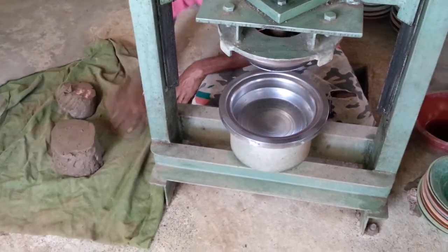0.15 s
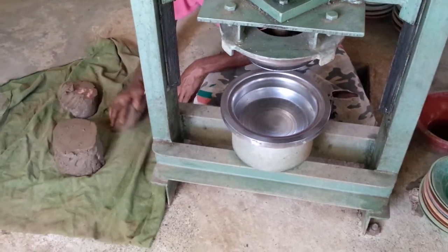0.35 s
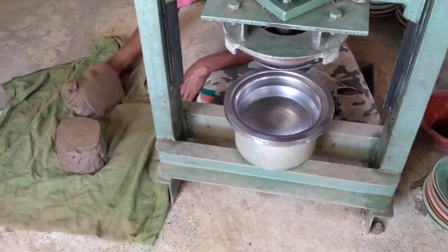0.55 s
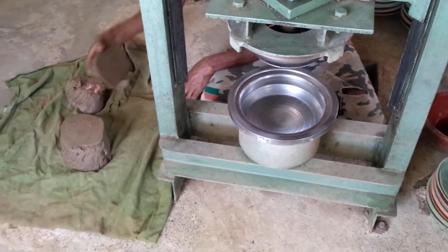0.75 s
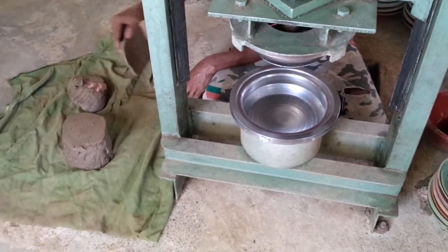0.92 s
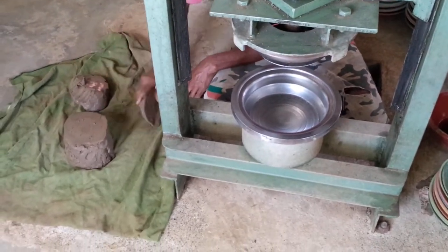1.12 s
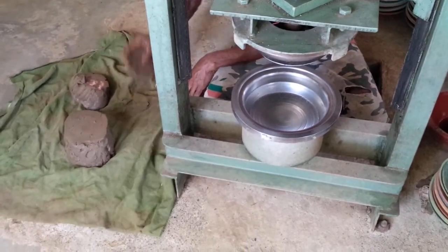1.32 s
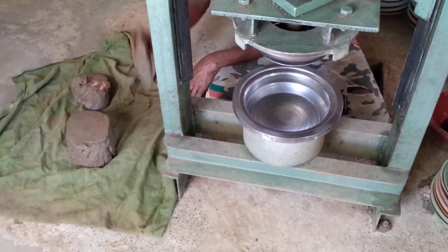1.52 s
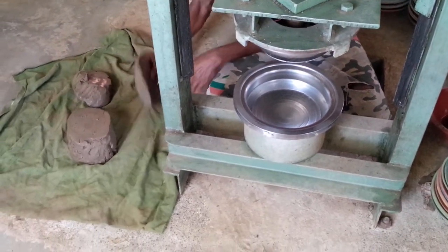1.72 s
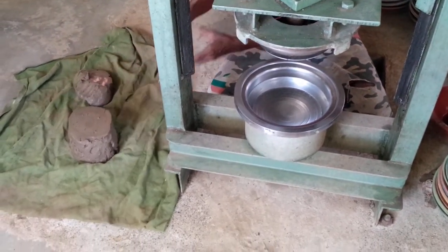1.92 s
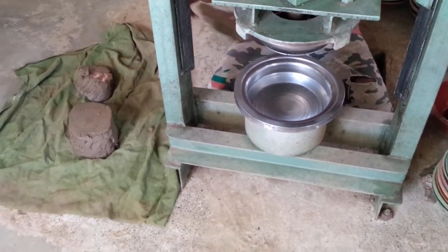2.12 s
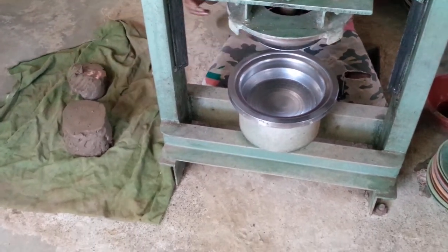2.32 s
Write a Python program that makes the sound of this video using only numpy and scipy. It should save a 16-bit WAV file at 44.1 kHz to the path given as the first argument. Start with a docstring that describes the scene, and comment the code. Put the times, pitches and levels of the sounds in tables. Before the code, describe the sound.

Lump of wet clay smacked down by hand, short roomy echo, later dull pats, faint insects

```python
"""Bare workshop open to the outdoors: air noise, wavering hum, insect hiss and a swelling rumble run throughout.
At 0.2 s a lump of wet clay is slapped down by hand beside a steel press: pressure swing, air-pocket pop,
wet crack and spray, then echoes, a noise-built room tail and the press's faint ringing modes.
Next the palm slides (filtered noise) and faint squeaks sound (narrow noise); near 1.12 s come soft pats
(noise puffs) and a hollow note (dying sine); from 1.6 s hands and cloth shuffle (filtered noise)."""
import sys
import numpy as np
from scipy import signal
from scipy.fft import rfft, irfft
from scipy.io import wavfile
from scipy.ndimage import uniform_filter1d

SR = 44100
rng = np.random.default_rng(int(sys.argv[2]) if len(sys.argv) > 2 else 0)


def inscribe(sig):
    """Save sig as 16-bit PCM at rate SR to the path in sys.argv[1].

    A 1-D sig is mono; a 2-D sig holds one channel per row.
    Samples are clipped to [-1, 1] before scaling.
    """
    pcm = np.round(np.clip(np.atleast_2d(sig).T, -1, 1) * 32767)
    wavfile.write(sys.argv[1], SR, pcm.astype(np.int16))


N = 103635  # samples


def amp(db):
    """Decibels to gain."""
    return 10 ** (np.asarray(db) / 20)


def evened(x):
    """Scales to rms 1."""
    return x / np.sqrt(np.mean(x ** 2) + 1e-20)


def read(points, hz):
    """Interpolates a table on a log-frequency axis."""
    f, value = np.transpose(points)
    return np.interp(np.log(hz + 1), np.log(f + 1), value)


def add(mix, start_s, sound):
    """Mixes a sound in at a start time, cut at the end of the mix."""
    part = mix[:, max(round(start_s * SR), 0):][:, :sound.shape[-1]]
    part += sound[..., :part.shape[1]]


def dying(t, t60_s):
    """Exponential decay: 60 dB down after t60_s."""
    return np.exp(-np.log(1000) * t / t60_s)


def drift(top_hz):
    """Slow random wander of rms 1: sines from 2 Hz to top_hz, weaker as they get faster."""
    t = np.arange(0, N + 128, 128) / SR
    wander = 0
    for f in np.geomspace(2, top_hz, 20):
        wander = wander + np.sin(2 * np.pi * (f * t + rng.random())) / np.sqrt(f)
    return np.interp(np.arange(N) / SR, t, evened(wander))


def grain(size, width):
    """Smoothed noise of rms 1; width in samples."""
    return evened(uniform_filter1d(rng.standard_normal(size), size=width))


def humps(rows):
    """Sum of Gaussian swells: middle in seconds, half length in seconds (to 1/e), level in dB."""
    t = np.arange(N) / SR
    return sum(amp(db) * np.exp(-((t - middle) / half) ** 2) for middle, half, db in rows)


def noise(colour_db, same):
    """Stereo noise of rms 1: gain per frequency sets colour, mid/side balance sets channel likeness."""
    hz = np.fft.rfftfreq(N, 1 / SR)
    mid, side = rfft(rng.standard_normal((2, N)))
    likeness = np.clip(read(same, hz), -1, 1)
    mid, side = mid * np.sqrt(1 + likeness), side * np.sqrt(1 - likeness)
    return evened(irfft(np.array([mid + side, mid - side]) * amp(colour_db(hz)), N))


# Likeness of background sound in the two channels. Each row: frequency in Hz, likeness 0-1.
AIR_LIKENESS = [(50, .995), (250, 0.94), (700, .93), (2000, .88), (4500, .65), (7500, 0.7), (12000, 0)]


def band(centre_hz, width_hz):
    """Narrow noise band: 3 dB down at width_hz either side of the centre."""
    return noise(lambda hz: -10 * np.log10(1 + ((hz - centre_hz) / width_hz) ** 4), AIR_LIKENESS)


# Colour of distant outdoor noise. Each row: frequency in Hz, relative level in dB.
AIR_COLOUR = [(20, -5), (50, 2.5), (75, -3.5), (105, -8.5), (140, -8), (220, -12.5), (400, -16),
              (700, -17.5), (1000, -20.5), (1500, -28.5), (2300, -35.5), (4500, -40.5), (9500, -44),
              (13000, -49), (16000, -58.5)]
AIR_DB, AIR_SWELL_DB = -52.5, 1.6  # swell is rms


def air():
    """Distant outdoor noise: coloured noise with a wandering level."""
    return noise(lambda hz: read(AIR_COLOUR, hz), AIR_LIKENESS) * amp(AIR_DB + AIR_SWELL_DB * drift(top_hz=24))


# Hum level before flutter. Each row: time in seconds, level in dB.
HUM_LEVEL = [(0, -66), (.6, -57), (1.05, -61), (1.4, -63), (1.699, -69.5), (2.35, -64.5)]
HUM_HZ, HUM_WAVER_HZ, HUM_FLUTTER_DB = 159.5, 4.9, 2  # waver and flutter are rms


def hum():
    """Wavering hum: one sine whose pitch and level wander."""
    level_db = np.interp(np.arange(N) / SR, *np.transpose(HUM_LEVEL))
    level_db = level_db + HUM_FLUTTER_DB * drift(top_hz=15)
    pitch_hz = HUM_HZ + HUM_WAVER_HZ * drift(top_hz=12)
    return amp(level_db) * evened(np.sin(2 * np.pi * np.cumsum(pitch_hz) / SR))


# Colour of the insect chorus. Each row: frequency in Hz, relative level in dB.
INSECT_COLOUR = [(5200, -35), (6100, -20), (6700, -7.5), (7330, -1.5), (7900, -7), (8400, -11.5),
                 (8900, -25.5), (10000, -45.5)]
INSECTS_DB, INSECTS_FLUTTER_DB = -63, 1.15  # flutter is rms


def insects():
    """Insect chorus: a steady high noise band with slight level flutter."""
    hiss = noise(lambda hz: read(INSECT_COLOUR, hz), AIR_LIKENESS)
    return hiss * amp(INSECTS_DB + INSECTS_FLUTTER_DB * drift(top_hz=41.4))


# Rumble swells. Each row: middle in seconds, half length in seconds, level in dB.
RUMBLE_SWELLS = [(.13, 0.055, -49.5), (.66, 0.078, -55), (1.115, 0.039, -46), (1.40, 0.042, -45.5),
                 (1.80, .09, -48)]
RUMBLE_HZ, RUMBLE_WIDTH_HZ = 51, 12


def rumble():
    """Low rumble: a narrow noise band, mono, that swells and fades."""
    return band(RUMBLE_HZ, RUMBLE_WIDTH_HZ).mean(0) * humps(RUMBLE_SWELLS)


THUMP_S, THUMP_DB = 0.00028, -11.5  # THUMP_S: swing's centre to its peak


def thump(t):
    """Pressure swing as the air is squeezed out: one smooth dip and peak."""
    u = t / THUMP_S - 3
    return amp(THUMP_DB) * u * np.exp((1 - u ** 2) / 2)


POP_HZ, POP_T60_S, POP_DB = 637, 0.004, -12


def pop(t):
    """Air pocket under the clay: slope of a short dying sine, scaled to its peak level."""
    ring = np.gradient(np.sin(2 * np.pi * POP_HZ * t) * t * dying(t, POP_T60_S))
    return amp(POP_DB) * ring / abs(ring).max()


def click(colour, size=4096):
    """Minimum-phase click of the given colour, energy 1."""
    log_gain = np.log(amp(read(colour, abs(np.fft.fftfreq(size, 1 / SR)))))
    wave = np.fft.ifft(np.exp(np.conj(signal.hilbert(log_gain)))).real
    return wave / np.linalg.norm(wave)


SPLAT_DB, SPLAT_T60_S = -3, 0.021
SPRAY_SHARED = .55  # gain of each channel's spray in the other


def spray(crack, t):
    """Wet spray: dying noise filtered by the slope of the crack."""
    drops = rng.standard_normal((2, len(t))) * dying(t, SPLAT_T60_S)
    drops = drops + SPRAY_SHARED * drops[::-1]
    wet = signal.fftconvolve(drops, np.diff(crack)[None], axes=1)[:, :len(t)]
    return amp(SPLAT_DB) * evened(wet) / np.sqrt(len(t))


# Colour of the wet contact crack. Each row: frequency in Hz, relative level in dB.
CRACK_COLOUR = [(40, -42.5), (120, -29), (270, 3), (700, 1), (1300, -9.5), (2200, -6.5), (3200, -8.5),
                (7200, -15.5), (11500, -22), (16000, -24.5)]
CRACK_DB = -13


def blow():
    """Direct sound of the slap: pressure swing, then spray, crack and pop together."""
    crack = click(CRACK_COLOUR)
    t = np.arange(len(crack)) / SR
    out = np.zeros((2, len(t)))
    add(out, 0, thump(t))
    add(out, 2 * THUMP_S, spray(crack, t) - amp(CRACK_DB) * crack - pop(t))
    return out


# Decay of the room. Each row: frequency in Hz, t60 in seconds.
ROOM_DECAY = [(100, .38), (250, 0.284), (500, 0.39), (1000, 0.35), (2500, 0.28), (5000, 0.3), (8000, 0.27),
              (12000, .195), (16000, .16)]
# Likeness of room sound in the two channels. Each row: frequency in Hz, likeness 0-1.
ROOM_LIKENESS = [(100, 1), (300, 0.89), (700, 0.86), (2000, 0.93), (4500, 0.84), (7500, 0.6), (12000, .25)]
ROOM_DELAY_S, ROOM_RISE_S, ROOM_HOLD_S = .002, 0.0087, 0.085
ROOM_CLUMP_DB = 1.5  # rms; reflections arrive in clusters


def held_age(t):
    """Decay clock that starts slowly, so sound holds briefly before dying."""
    return np.hypot(t, ROOM_HOLD_S) - ROOM_HOLD_S


def room(colour):
    """Dense reflections: noise that builds up, holds, then dies at a rate set per frequency; energy 1."""
    source = noise(lambda hz: read(colour, hz), ROOM_LIKENESS)
    hz, t, z = signal.stft(source, SR, nperseg=256)
    z = z * dying(held_age(t), read(ROOM_DECAY, hz)[:, None])
    tail = signal.istft(z, SR, nperseg=256)[1][:, :SR]
    tail = tail * np.minimum(np.arange(SR) / SR / ROOM_RISE_S, 1)
    tail = tail * amp(ROOM_CLUMP_DB * grain(SR, width=130))
    return evened(tail) / np.sqrt(SR)


# Modes of the steel press and its bowl. Each row: frequency in Hz, relative level in dB, t60 in seconds.
PRESS_MODES = [(318.2, -3, .28), (430.5, 1, .25), (470, 0, 0.25), (501, 3, .27), (512.2, 0.5, 0.42),
               (566, 1, .32), (586, 0.5, .28), (663.6, 0, .3), (693.4, 0, 0.22), (765, -5, 0.087),
               (833, -2, .26), (870, -1, 0.24), (1013, -4.5, 0.13), (1019, -1.5, 0.3), (1126, -8, .27),
               (1153, -4, .23), (1875, -7.5, .28), (3630, -6.5, 0.2)]
PRESS_RISE_S = .012


def press():
    """Frame and bowl ring in sympathy: sine modes that rise, hold with the room, then die."""
    t = np.arange(SR) / SR
    count = len(PRESS_MODES)
    # random phase per mode in turns, slightly different per channel
    turns = rng.random((count, 1, 1)) + .04 * rng.standard_normal((count, 2, 1))
    ring = 0
    for (hz, db, t60_s), turn in zip(PRESS_MODES, turns):
        ring = ring + amp(db) * dying(held_age(t), t60_s) * np.sin(2 * np.pi * (hz * t + turn))
    return ring * np.minimum(t / PRESS_RISE_S, 1)


# The hard slap: start in seconds, gain in dB.
SLAP_EVENT = (.2020, 5.68)
# Echoes from floor and press. Each row: delay in seconds, level in dB, left-right difference in dB.
SLAP_ECHOES = [(.0039, -8.5, -6.5), (.0068, -19, -0.5), (0.02, -14.5, -1.5), (0.0319, -16, 5)]
# Colour of the room's answer. Each row: frequency in Hz, relative level in dB.
ROOM_COLOUR = [(40, -43), (90, -28), (122, -12), (155, -19.5), (280, -6), (380, -8), (500, -4), (620, -4.5),
               (800, -4), (1000, -7), (1300, -8), (1650, -9), (2300, -10), (3000, -16.5), (3700, -14.5),
               (4800, -18), (5600, -22.5), (7200, -20.5), (9000, -25.5), (11500, -25), (16000, -35)]
TOUCH_S, TOUCH_DB = 0.0024, -20.5  # an edge of the lump lands this much earlier, this much softer
ROOM_DB, PRESS_DB = 8.5, -35  # before the slap's gain


def slap():
    """Clay hits: soft edge contact, main blow, panned echoes, then room and press."""
    direct = blow()
    out = np.zeros((2, N))
    start_s, gain_db = SLAP_EVENT
    add(out, start_s - TOUCH_S, amp(TOUCH_DB) * direct)
    add(out, start_s, direct)
    for delay_s, echo_db, pan_db in SLAP_ECHOES:
        add(out, start_s + delay_s, direct * amp([[echo_db + pan_db / 2], [echo_db - pan_db / 2]]))
    answer = amp(ROOM_DB) * room(ROOM_COLOUR) + amp(PRESS_DB) * press()
    add(out, start_s + ROOM_DELAY_S, answer)
    return amp(gain_db) * out


# Palm slides after a blow. Each row: middle in seconds, half length in seconds, level in dB before flutter.
PALM_SLIDES = [(.45, 0.021, -68), (1.153, 0.017, -55.5)]
# Colour of a slide. Each row: frequency in Hz, relative level in dB.
SLIDE_COLOUR = [(300, -7), (1000, 0), (1500, -1), (2300, -1), (3000, -7), (3500, -5), (4050, 5.5),
                (4700, -20), (10000, -17), (16000, -30)]


def slides():
    """Palm slides over damp clay: short coloured noise swells with fast level flutter."""
    rub = noise(lambda hz: read(SLIDE_COLOUR, hz), ROOM_LIKENESS)
    return rub * humps(PALM_SLIDES) * amp(2 * drift(top_hz=146))


# Faint squeaks. Each row: middle in seconds, half length in seconds, pitch in Hz, level in dB.
SQUEAK_EVENTS = [(.815, .02, 2060, -74), (0.857, 0.042, 2160, -71.5), (1.173, 0.024, 1920, -69),
                 (1.193, 0.027, 2830, -73), (1.25, .02, 1580, -71)]
SQUEAK_WIDTH_HZ = 70


def squeaks():
    """Thin, brief, faint whistles: narrow noise bands."""
    out = 0
    for middle_s, half_s, hz, db in SQUEAK_EVENTS:
        out = out + band(hz, SQUEAK_WIDTH_HZ) * humps([(middle_s, half_s, db)])
    return out


# Soft pats on the clay. Each row: start in seconds, level in dB.
PAT_EVENTS = [(1.1195, -17.5), (1.1255, -16), (1.1385, -21.5), (1.1432, -24)]
# Colour of a pat. Each row: frequency in Hz, relative level in dB.
PAT_COLOUR = [(50, 1.5), (150, -3), (320, 3.5), (420, -11), (650, 2), (900, -3), (1250, -9), (1480, -7.5),
              (2700, -11), (3700, -17.5), (4900, -30.5), (10000, -32), (16000, -50)]
PAT_RISE_S, PAT_T60_S, PAT_GRAIN_DB = .002, 0.097, 2  # sticky clay makes the puff grainy (rms)
PAT_ROOM_DB, PAT_RING_DB = -11, -50.5  # before each pat's level


def pats():
    """Palm and fingers land one after another: dull dying noise puffs with a little room and press."""
    out, t = np.zeros((2, N)), np.arange(N) / SR
    for start_s, db in PAT_EVENTS:
        puff = noise(lambda hz: read(PAT_COLOUR, hz), ROOM_LIKENESS)
        puff = puff * dying(t, PAT_T60_S) * np.minimum(t / PAT_RISE_S, 1)
        puff = puff * amp(PAT_GRAIN_DB * grain(N, width=60))
        add(out, start_s, amp(db) * evened(puff) / np.sqrt(N))
        answer = amp(PAT_ROOM_DB) * room(PAT_COLOUR) + amp(PAT_RING_DB) * press()
        add(out, start_s + ROOM_DELAY_S, amp(db) * answer)
    return out


HOLLOW_AT_S, HOLLOW_HZ, HOLLOW_DB, HOLLOW_T60_S = 1.137, 655, -41.5, 0.14


def hollow():
    """Cupped palm sounds hollow as it closes on the clay: one dying sine."""
    t = np.arange(SR) / SR
    out = np.zeros((2, N))
    note = dying(t, HOLLOW_T60_S) * np.sin(2 * np.pi * HOLLOW_HZ * t)
    add(out, HOLLOW_AT_S, amp(HOLLOW_DB) * note)
    return out


# Shuffles. Each row: middle in seconds, half length in seconds, level in dB before flutter.
SHUFFLE_EVENTS = [(1.66, 0.063, -61), (1.815, 0.035, -57), (2.09, 0.031, -60), (2.21, 0.11, -60)]
# Colour of a shuffle. Each row: frequency in Hz, relative level in dB.
SHUFFLE_COLOUR = [(60, -18.5), (200, 1), (550, 3.5), (1000, -2), (1600, -10.5), (2800, -26.5), (10000, -29),
                  (16000, -42)]


def shuffles():
    """Hands and cloth rub softly: coloured noise swells with uneven level."""
    rub = noise(lambda hz: read(SHUFFLE_COLOUR, hz), ROOM_LIKENESS)
    return rub * humps(SHUFFLE_EVENTS) * amp(2 * drift(top_hz=81.8))


def scene():
    """Sum of all sources, stereo."""
    handling = slap() + pats() + slides() + hollow() + shuffles() + squeaks()
    background = air() + rumble() + hum() + insects()
    return handling + background


EDGE_HZ = 16000


def record(dry):
    """Rounds off peaks near full scale, then low-passes at EDGE_HZ."""
    held = dry / (1 + dry ** 10) ** (1 / 10)
    lowpass = signal.firwin(511, EDGE_HZ, window=("kaiser", 9), fs=SR)
    return signal.oaconvolve(held, lowpass[None], "same")


dry = scene()
out = record(dry)
inscribe(out)
```